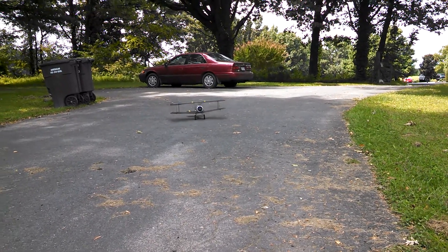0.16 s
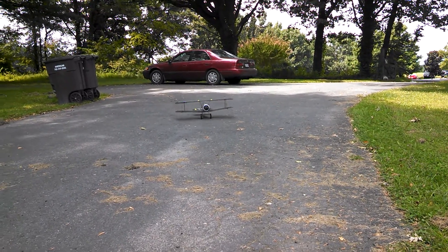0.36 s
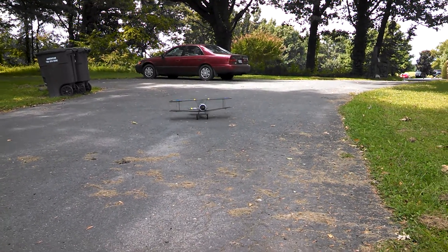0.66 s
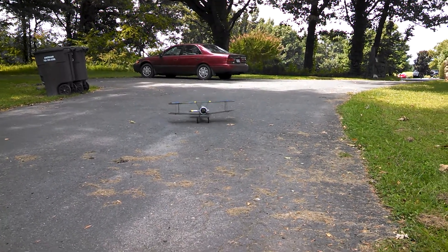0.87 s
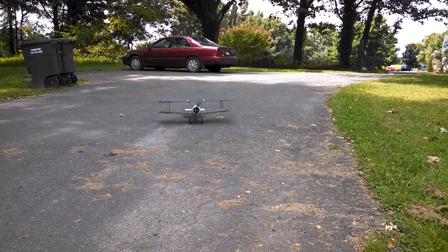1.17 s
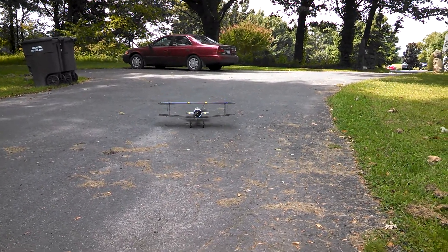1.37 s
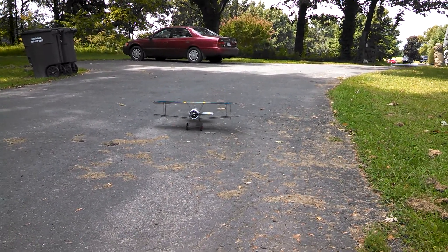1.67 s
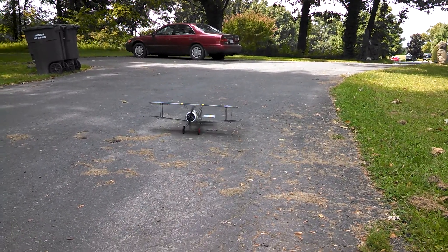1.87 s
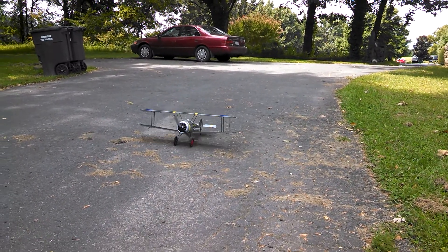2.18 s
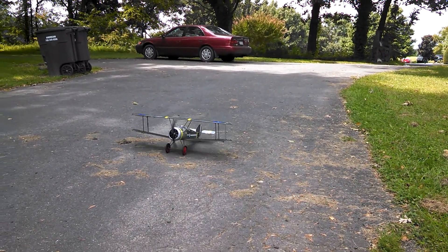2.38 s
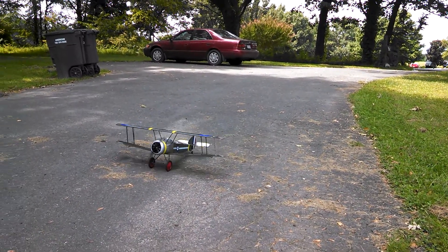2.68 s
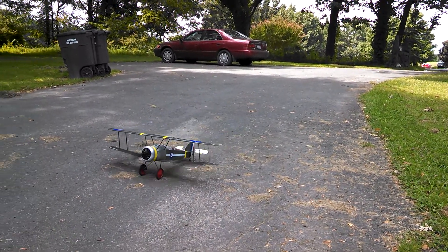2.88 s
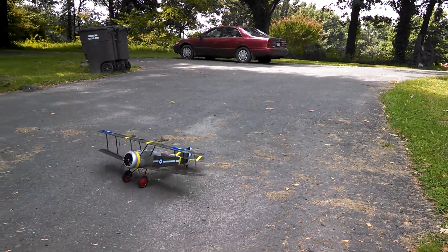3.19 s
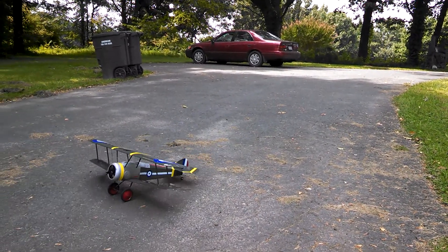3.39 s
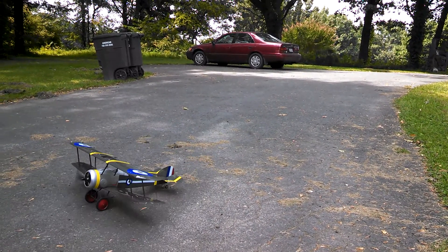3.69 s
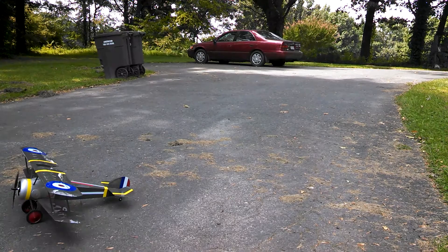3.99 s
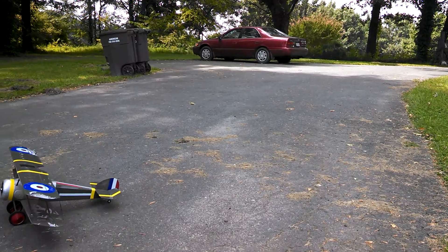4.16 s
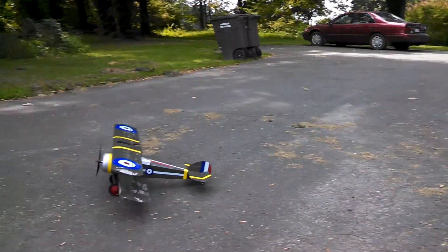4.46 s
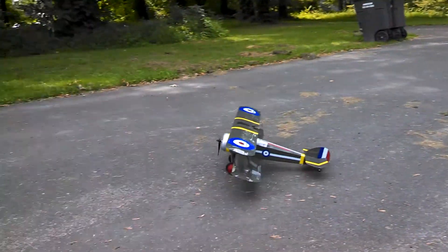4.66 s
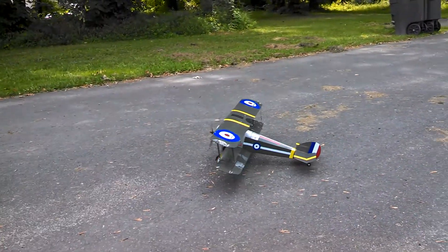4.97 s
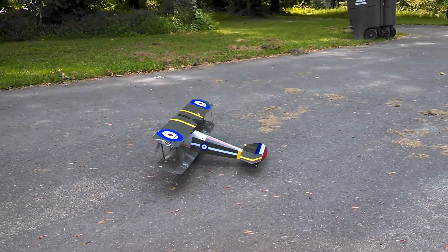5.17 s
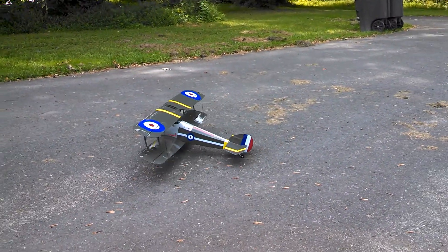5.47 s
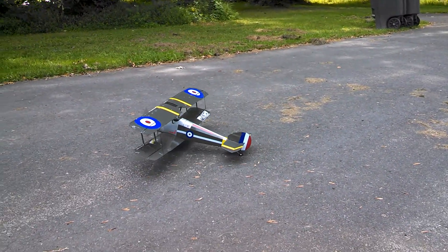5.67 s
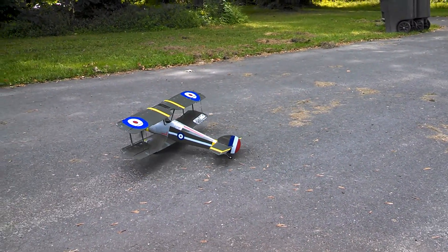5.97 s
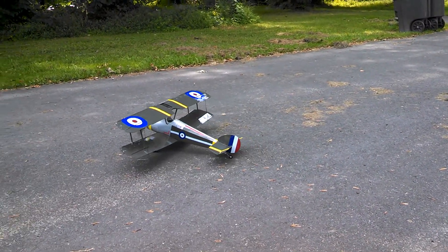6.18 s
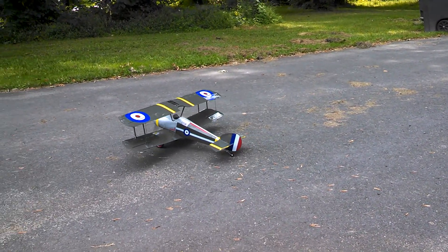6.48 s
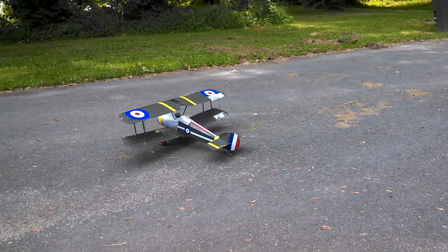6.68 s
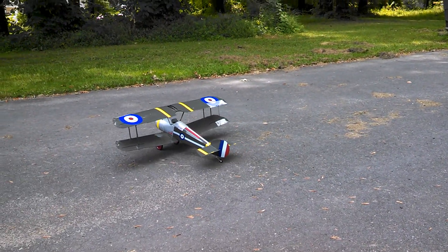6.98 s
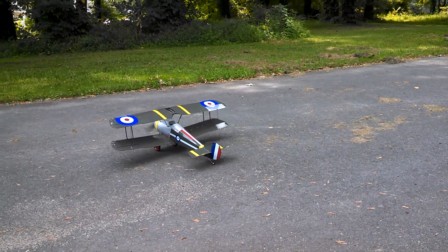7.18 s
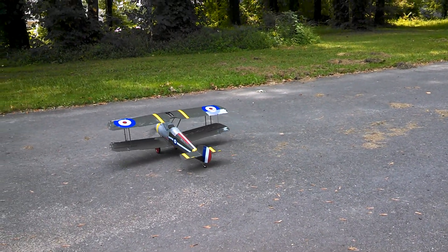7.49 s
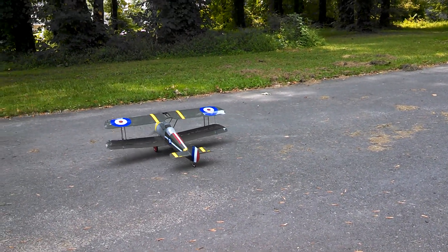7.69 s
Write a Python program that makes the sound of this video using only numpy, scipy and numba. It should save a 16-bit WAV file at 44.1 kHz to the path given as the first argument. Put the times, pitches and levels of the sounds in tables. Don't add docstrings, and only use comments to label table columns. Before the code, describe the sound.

A small electric model plane whines and ticks over gritty pavement while a cicada buzzes in dipping pulses and wind gusts thump the microphone.

```python
import sys
import numpy as np
from scipy import signal
from scipy.fft import rfft, irfft, next_fast_len
from scipy.io import wavfile
from scipy.ndimage import uniform_filter1d
from numba import njit

SR = 44100
rng = np.random.default_rng(int(sys.argv[2]) if len(sys.argv) > 2 else 0)


def master(y):
    cut = np.clip(np.atleast_2d(y).T, -1, 1)
    pcm = np.round(cut * 32767)
    wavfile.write(sys.argv[1], SR, pcm.astype(np.int16))


def level_to_linear(level):
    exponent = np.asarray(level, float) / 20
    return 10 ** exponent


N = 346185
T = np.arange(N) / SR

# [t/s, shaft rate asked for f/Hz]
THROTTLE = [(.3, 29.5), (.62, 33), (.85, 28.5), (1.45, 24.9), (1.7, 22), (2.3, 25.5), (2.55, 32.8),
            (2.96, 34.7), (3.4, 27), (4.08, 28.6), (4.4, 30.4), (5.35, 29.9), (5.7, 30.9), (6.28, 31.8),
            (6.335, 41.4), (6.8, 41.9), (7.1, 40.1), (7.85, 37.5)]
# [t/s, order 36 re hiss level/dB, order 42 re order 36 level/dB]
MOTOR_LOAD = [(.3, -16, -13), (.62, -8, -6), (.85, -18, 7), (1.45, -11, 7.5), (1.7, -25, 10),
              (2.33, -18.5, 0), (2.58, -0.5, 0), (2.72, -6, 3), (2.98, 3.5, -18), (3.3, -2.5, -17),
              (3.85, -19, 3), (4.08, -3, -3), (4.4, -0.5, 1.5), (5.55, -1.5, 1), (6.27, -9, -1),
              (6.36, 2.5, -10), (6.75, 0.5, -6.5), (7.85, 1, -18)]
# [multiple of shaft rate, level/dB near 40 Hz, slope/(dB per Hz of shaft rate)]
LOW_ORDERS = [(12, -0.5, 1.5), (13, 3.5, 0.4), (14, -3, 0.6), (16, -21, -2.5), (24, -12, 3), (28, -3.5, 1),
              (35, 0.5, 0), (86, -27, 2)]
# [offset/shaft rates, level/dB, 1 = near flank, 0 = far flank]
SIDEBANDS = [(42, 5, 0), (14, -8, 0), (21, -12, 0), (4, 0, 1), (8, -5, 1), (-4, -6, 1), (-8, -6, 1)]
# [t/s, re hiss level/dB]
WHISTLE_LEVEL = [(0, 19.5), (.6, 19), (1.04, 12.5), (1.47, 14), (1.67, -14), (1.95, -2), (2.35, 20),
                 (2.5, 16), (2.8, 26.5), (3.4, 19.5), (4.08, 25), (4.6, 21), (5.4, 21), (5.75, 12),
                 (6.62, 17.5), (6.75, 26.5), (7.25, 27), (7.85, 13.5)]
# [t/s, f/Hz]
WHISTLE_PITCH = [(0, 7788), (.6, 7803), (1.45, 7824), (2.05, 7817), (2.5, 7798), (3.4, 7786), (4, 7779),
                 (6.35, 7769), (6.7, 7758), (7.85, 7757)]
# [t/s, depth/dB]
ECHO_FADES = [
    (2.88, 4),
    (3.08, 2),
    (3.49, 11),
    (4.53, 11),
    (4.72, 19.5),
    (5.16, 8),
    (5.91, 1),
    (7.788, 13),
]
# [t/s, re hiss level/dB]
ROLL = [(0, 15.5), (.4, 20.5), (.9, 21), (1.9, 23), (2.6, 21), (3.3, 21.5), (3.45, 15), (3.95, 13.5),
        (4.3, 17), (5.2, 11.5), (5.5, 7.5), (6, 7.5), (6.6, 11), (7.85, 15)]
# [t/s, body level/dB, sharp tick re body level/dB]
GRIT_STRIKES = [(0.379, -14.5, -11.5), (0.6523, -18.5, -14), (0.696, -22, -11), (0.824, -20, -13),
                (0.99, -37, 6), (1.195, -24, -13), (1.241, -20, -25), (1.2848, -22, -25), (1.453, -22, -9),
                (1.5, -15.5, -24), (1.5563, -16.5, -12), (1.6985, -19, -8), (1.7854, -18.5, -20),
                (1.929, -25.5, -15), (2.3033, -26, -5), (2.5096, -24.5, -6), (2.6686, -19.5, -7),
                (2.8842, -21.5, -8), (3.0874, -16, -37), (3.1552, -19, -13), (3.175, -20.5, -1),
                (3.2348, -18.5, -4.5), (3.493, -24, -7), (3.8143, -24.5, -7), (4.1248, -21, -23),
                (4.232, -22, -44), (4.4416, -25, -35), (4.636, -21, -17), (4.7345, -17.5, -35),
                (4.9502, -15, -27), (2.9025, -26, -17), (3.0149, -23, -9), (3.04, -23, -8),
                (3.0757, -24, -30), (3.1397, -28, -19), (3.193, -20.5, -8), (3.3139, -26, -20),
                (3.3395, -22.5, -10), (3.6087, -26, -22.5), (3.6326, -28, -24), (3.6675, -31, -23),
                (3.786, -29, -13.5), (3.9599, -24, -19), (4.2777, -24.5, -27), (4.7196, -22, -22),
                (5.133, -33, -26), (5.161, -38, -25), (5.362, -27, -17), (0.2257, -35, -15),
                (0.335, -32, -22), (0.422, -28.5, -21), (0.511, -29, -10), (0.617, -27, -20),
                (0.8684, -24.5, -11), (1.06, -28.5, -12), (1.3954, -30, -20), (1.4243, -32, 1),
                (1.6453, -40, -3), (1.8214, -22, -16), (2.3328, -28.5, 1)]
# [f/Hz, width/Hz, level/dB]
AIRFRAME = [(567, 147, -1.5), (1498, 683, -1), (2600, 170, -59), (1764, 154, -15)]
# [f/Hz, density level/dB]
CHORUS = [(2200, -99), (3000, -17.5), (3650, -3), (4100, -24), (4900, -9.5), (5700, 3.5), (7000, -6.5),
          (8500, -3.5), (10000, -41)]
# [f/Hz, density level/dB]
GROUND = [(200, 15), (500, 14.5), (800, -0.5), (1500, -13), (2200, -6), (2750, -48), (5000, 0.5),
          (10000, -49)]
# [f/Hz, density level/dB]
HISS = [(300, 4), (2750, -7), (4000, 8.5), (9000, -14), (12500, -11), (15300, 3), (15600, -8)]
# [f/Hz, width/Hz, level/dB]
FAR_SINGERS = [(3618, 47, -6.5), (4100, 9.6, -12.5), (4630, 15, -9.5), (5310, 18, -1), (6404, 19, -6.5),
               (6730, 40, -13.5), (7300, 31, -32)]
# [crest t/s, rumble level/dB, length/s, edge re rumble level/dB]
GUSTS = [(0.597, -32.5, 0.39, -18), (0.768, -26, 0.16, -17.5), (1.109, -29.5, 0.18, -20.5),
         (1.362, -33, 0.13, -13), (1.486, -23, 0.089, -17), (1.65, -34, 0.24, -23), (1.856, -31, 0.066, -4),
         (1.998, -31, 0.17, -9.5), (2.253, -32, 0.052, -6.5), (2.583, -38.5, 0.51, -20),
         (2.732, -36, 0.22, -22), (3.055, -40, 0.14, -18), (3.283, -43, 0.14, -15),
         (3.754, -40.5, 0.32, -19), (4.007, -23.5, 0.087, -8), (4.29, -37.5, 0.091, -14.5),
         (4.62, -38.5, 0.061, -17), (4.746, -29.5, 0.04, -21), (5.033, -40, 0.48, -37),
         (5.457, -31, 0.13, -16), (5.605, -24, 0.088, -7.5), (5.893, -41, 0.3, -5.5),
         (6.032, -33, 0.18, -30.5), (6.359, -33.5, 0.093, -7), (6.595, -44, 0.26, -34),
         (7.111, -40, 0.1, -15), (7.415, -33.5, 0.071, -18.5), (7.608, -39, 0.15, -21)]
# [t/s, peak level/dB, f/Hz]
EDDIES = [(0.546, -29.5, 209), (0.668, -14, 87), (0.779, -11, 100.4), (0.906, -21, 91.5), (1.354, -23, 119),
          (1.871, -18.5, 232), (1.884, -15, 109), (1.967, -18, 277), (1.992, -14, 179), (2.25, -27, 267),
          (2.271, -30.5, 92), (2.504, -24.5, 132), (3.99, -11.5, 122), (4.008, -21, 96),
          (4.037, -18.5, 298), (4.138, -27, 156), (4.299, -26.5, 150), (5.443, -25, 199), (5.521, -22, 204),
          (5.596, -12.5, 160), (5.612, -14, 100), (5.616, -18, 393), (5.64, -38, 91.5), (5.723, -23.5, 101),
          (5.804, -30, 170), (5.466, -15.5, 111), (6.025, -26, 134), (6.354, -18.5, 135),
          (6.389, -22.5, 138), (7.129, -26.5, 127), (5.617, -45, 600), (4.001, -30.5, 445)]
# [t/s, length/s, stack re hiss level/dB, preceding buzz re hiss level/dB]
DROPS = [(0.056, 0.17, 12.5, 22), (0.661, 0.19, 15.5, 18), (1.258, 0.19, 14.5, 15.5), (1.848, 0.21, 15, 18),
         (2.439, 0.17, 16, 19.5), (3.008, 0.2, 13, 19), (3.409, 0.13, 10, 11), (3.914, 0.22, 9.5, 15),
         (4.458, 0.22, 18, 19.5), (5.011, 0.2, 17, 18), (5.539, 0.2, 15.5, 16.5), (6.102, 0.188, 13, 12.5),
         (6.695, 0.15, 17.5, 13), (7.22, 0.14, -13, 18), (7.84, 0.12, 0, 13)]
# [multiple of click rate, level/dB]
STACK = [(9, -13), (10, -2), (11, -7), (12, 0), (12.5, -12), (13, -8), (14, -16)]
# [t/s, push level/dB, ring level/dB, ring f/Hz, decay/ms, swing f/Hz]
KNOCKS = [
    (3.3979, -11.5, -23, 7600, 2.5, 800),
    (7.0811, -13, -15, 4000, .8, 600),
]
# [t/s, hiss level/dB]
DUCKS = [(0, -51), (.55, -52), (0.788, -58), (1.981, -63.5), (2.27, -58), (3.181, -56.5), (3.399, -59),
         (4.018, -63.5), (5.47, -51), (5.596, -58.5), (5.613, -63.5), (6.03, -58.5), (7.083, -65.5),
         (7.41, -60.5)]

SPIN_UP_S, SHAFT_JITTER = .13, .003
SURGE_DB_PER_HZ_S = 0.07
LOW_DB, NEAR_FLANK_DB, FAR_FLANK_DB = -2, -20, -8
CLOSE_S, APPROACH_DB_PER_S = 2.2, 7
FADE_S = 0.043
THUD_FAR_DB, THUD_NEAR_DB, NEAREST_S, NEAR_FOR_S = -31, -18, 3.35, 2.1
BREEZE_DB, BREEZE_EDGE_DB = -52.5, -15.5
GUST_SLOPE_DB, RISE_SHARE = 15.5, 0.59
STACK_FROM, STACK_FOR = .17, .58
STACK_TILT_DB = 7
HALF_RATE_SHARE = .12
RISE_FROM, RISE_DB = .7, -10
CASE_HZ, CASE_DB = 6250, -1
BRIGHT_HZ_MS, SNAP_DB_MS, SNAP_S = 21000, 6.3, .00004
OPEN_DB, RECOVER_DB_PER_S = -53, 9.5
CROSS_LAG_SAMPLES, TOP_HZ = 16, 15550
MISMATCH_DB, MISMATCH_HZ = 1.12, 2390


def columns(table):
    s, *rest = np.transpose(table)
    return [np.interp(T, s, c) for c in rest]


def unit(x):
    return x / np.sqrt(np.mean(x ** 2))


def band(x, lo_hz, hi_hz, order=2):
    return signal.sosfilt(signal.butter(order, [lo_hz, hi_hz], "bandpass", fs=SR, output="sos"), x)


def lowpass(x, hz, order):
    return signal.sosfilt(signal.butter(order, hz, fs=SR, output="sos"), x)


def half_sine(part):
    return np.sin(np.pi * part.clip(0, 1)).clip(0)


def walk(rate_hz):
    k = int(SR / rate_hz)
    held = np.repeat(rng.standard_normal(N // k + 1), k)
    return 1.3 * uniform_filter1d(uniform_filter1d(held, k), k)[:N]


def coloured(spectrum, alike):
    hz, db = np.transpose(spectrum)
    size = next_fast_len(N)
    bin_hz = np.arange(size // 2 + 1) * SR / size
    shape = level_to_linear(np.interp(np.log(bin_hz + 1), np.log(hz), db, left=-60, right=-60))
    a, b = irfft(rfft(rng.standard_normal((2, size))) * shape, size)[:, :N]
    return unit(np.array([a, alike * a + np.sqrt(1 - alike ** 2) * b]))


def ports(x, far_db, lag_samples):
    size = next_fast_len(N)
    turn = np.exp(-2j * np.pi * np.arange(size // 2 + 1) / size * lag_samples)
    return np.array([x, level_to_linear(far_db) * irfft(rfft(x, size) * turn, size)[:N]])


def tone(hz):
    cycles = np.cumsum(hz) / SR + rng.random()
    return np.sqrt(2) * np.sin(2 * np.pi * (cycles % 1))


@njit
def svf(x, hz, width):
    y, b, l = np.empty(len(x)), 0., 0.
    for i in range(len(x)):
        g, k = np.tan(np.pi * hz[i] / SR), width / hz[i]
        v = (b + g * (x[i] - l)) / (1 + g * (g + k))
        b, l, y[i] = 2 * v - b, l + 2 * g * v, k * v
    return y


def resonate(x, hz, width_hz):
    return unit(svf(svf(x, hz, width_hz), hz, width_hz))


def recorder_gain():
    s, db = np.transpose(DUCKS)[:, :, None]
    recovering_db = np.where(T >= s, db + RECOVER_DB_PER_S * (T - s), OPEN_DB)
    return uniform_filter1d(recovering_db.min(axis=0).clip(max=OPEN_DB), size=64)


def motor(hiss_db):
    (shaft,), (load_db, balance_db) = columns(THROTTLE), columns(MOTOR_LOAD)
    keep = np.exp(-1 / (SPIN_UP_S * SR))
    shaft = shaft[0] + signal.lfilter([1 - keep], [1, -keep], shaft - shaft[0])
    surge_db = SURGE_DB_PER_HZ_S * np.gradient(uniform_filter1d(shaft, size=1500), 1 / SR).clip(0)
    shaft = shaft * (1 + 0.00193 * walk(11) + SHAFT_JITTER * walk(70))

    slot_db = hiss_db + load_db + surge_db
    magnet_db, low_db = slot_db + balance_db, slot_db + LOW_DB
    hum = level_to_linear(slot_db + 5 + 1.5 * walk(35)) * tone(36 * shaft)
    hum = hum + level_to_linear(magnet_db + 5 + 1.7 * walk(35)) * tone(42 * shaft)
    for k, db, gain_db in LOW_ORDERS:
        level = level_to_linear(low_db + db + gain_db * (shaft - 40.5))
        hum = hum + level * (1 + 0.21 * walk(18)) * tone(round(k) * shaft)

    (whistle_hz,), (whistle_db,) = columns(WHISTLE_PITCH), columns(WHISTLE_LEVEL)
    fade_db = sum(db * np.exp(-((T - s) / FADE_S) ** 2) for s, db in ECHO_FADES)
    whistle_db = hiss_db + whistle_db - fade_db
    distance_db = APPROACH_DB_PER_S * (CLOSE_S - T).clip(0)
    far_flank = level_to_linear(hiss_db + FAR_FLANK_DB + surge_db / 2 - distance_db - whistle_db)
    carrier_level = level_to_linear(whistle_db + 2.0 * walk(22))
    whistle = tone(whistle_hz)
    for k, db, near in SIDEBANDS:
        flank = level_to_linear(NEAR_FLANK_DB) if near > .5 else far_flank
        whistle = whistle + flank * level_to_linear(db) * (1 + 0.25 * walk(15)) * tone(whistle_hz + int(k) * shaft)
    return ports(hum, -4.5, 10.1) + ports(carrier_level * whistle, -12.5, 1.27)


def wheels(hiss_db, roll_db):
    body, thud, tick = np.zeros((3, N))
    n = np.arange(256)
    envelope = np.hanning(512)[256:] ** 2 * np.minimum(n / 30, 1)
    shots = rng.standard_normal((len(GRIT_STRIKES), 256)) * envelope
    for (s, body_db, sharp_db), shot in zip(GRIT_STRIKES, shots):
        i = int(s * SR)
        near = np.exp(-((s - NEAREST_S) / NEAR_FOR_S) ** 2)
        thud_db = body_db + THUD_FAR_DB + near * (THUD_NEAR_DB - THUD_FAR_DB)
        body[i:i + 256] += level_to_linear(body_db + 8.5) * shot * np.minimum(n / 70, 1)
        thud[i:i + 256] += level_to_linear(thud_db + 32.0) * shot
        tick[i:i + 256] += level_to_linear(body_db + sharp_db + 8) * shot * np.exp(-n / 100)
    grit = rng.standard_normal(N) * level_to_linear(3.94 * walk(60).clip(max=2) + hiss_db + roll_db + 3.5)
    rings = sum(level_to_linear(db) * band(drive + grit, hz - w / 2, hz + w / 2, order=1)
                for drive, (hz, w, db) in zip((thud, body, body, body), AIRFRAME))
    sharp = band(tick, 3800, 10800, order=1)
    scuff = level_to_linear(-16.5) * band(grit, 5500, 9300, order=1)
    return ports(rings + sharp + scuff, -10.5, 9.4)


def far_singers():
    noise = rng.standard_normal((len(FAR_SINGERS), 2, N))
    return sum(level_to_linear(db + 2 * walk(4.69)) * unit(band(x, hz - w / 2, hz + w / 2, order=1))
               for x, (hz, w, db) in zip(noise, FAR_SINGERS))


def background():
    hiss = level_to_linear(6.0) * coloured(HISS, 0.012)
    chorus = level_to_linear(13.0 + 1.26 * walk(5.8)) * coloured(CHORUS, 0.019)
    ground = level_to_linear(3.0 + walk(17.0)) * coloured(GROUND, 1.0)
    return hiss + chorus + ground + level_to_linear(7.5) * far_singers()


def gusts():
    rumble, edge = level_to_linear(2 * BREEZE_DB), level_to_linear(2 * (BREEZE_DB + BREEZE_EDGE_DB))
    for s, db, length, edge_db in GUSTS:
        side_s = length * np.where(T < s, RISE_SHARE, 1)
        power = level_to_linear(2 * (db - GUST_SLOPE_DB * np.abs(T - s) / side_s))
        rumble, edge = rumble + power, edge + level_to_linear(2 * edge_db) * power
    return 10 * np.log10(rumble), 10 * np.log10(edge / rumble)


def wind():
    rumble_db, edge_db = gusts()
    lumps_db = 3 * walk(30).clip(max=1.5)
    rumble = unit(band(rng.standard_normal((2, N)), 24.7, 107.7, order=3)) * level_to_linear(lumps_db)
    edge_db = edge_db + lumps_db + 4.6 * walk(80).clip(max=1.3)
    edge = unit(band(rng.standard_normal((2, N)), 62, 265, order=3)) * level_to_linear(edge_db)
    out = level_to_linear(rumble_db + np.array([[9], [11]])) * (rumble + edge)
    t = np.arange(-512, 512) / SR
    for (s, db, hz), turn in zip(EDDIES, rng.random(len(EDDIES))):
        i = int((s + 0.00605) * SR)
        slap = np.exp(-(1.75 * hz * t) ** 2) * np.sin(2 * np.pi * (hz * t + turn))
        out[1, i - 512:i + 512] += level_to_linear(db + 11.5) * slap
    return .5 * np.tanh(out / .5)


def cicada(hiss_db):
    chance = rng.standard_normal((int(N / SR * 320), 2))
    at = (np.cumsum(1 + .04 * chance[:, 0]) * SR / 286).astype(int)
    clicks = np.zeros(N)
    clicks[at[at < N]] = level_to_linear(3.3 * chance[:, 1])[at < N]
    tail = rng.standard_normal(2048) * np.exp(-np.arange(2048) / (0.012 * SR))
    tail[0] = 8
    smeared = signal.fftconvolve(clicks, tail)[:N]

    drop, swell, rise = np.zeros((3, N))
    rate_hz = np.full(N, 362.)
    for s, length, db, _ in DROPS:
        span = slice(int(s * SR), int((s + length) * SR))
        part = (T[span] - s) / length
        drop[span] = np.abs(np.sin(np.pi * part)) ** 0.9
        swell[span] = level_to_linear(db) * half_sine((part - STACK_FROM) / STACK_FOR) ** 0.39
        rate_hz[span] += 38 * (part - .66) ** 2
        rise[span] = level_to_linear(db + RISE_DB) * half_sine((part - RISE_FROM) / (1 - RISE_FROM))

    start, length, _, effort_db = np.transpose(DROPS)
    coming = np.minimum(np.searchsorted(start + length / 2, T), len(start) - 1)
    effort_db = uniform_filter1d(effort_db[coming], size=2000)
    belly_hz = 5750 - 1600 * drop
    buzz = resonate(smeared, belly_hz, 1200.) + level_to_linear(-5) * resonate(smeared, 1.15 * belly_hz, 1300.)
    buzz = buzz * level_to_linear(-18 * drop ** 3 + 1.2 * walk(14))
    note = resonate(smeared, belly_hz, 260.)

    stack = np.zeros(N)
    for k, db in STACK:
        level = level_to_linear(db + STACK_TILT_DB * (k - 11.5) * (1 - drop))
        stack += level * (1 + 0.4 * walk(40)) * tone(k * rate_hz)
    stack = stack * (1 + HALF_RATE_SHARE * (1 + walk(8)).clip(0) * tone(rate_hz / 2))
    song = level_to_linear(effort_db + 2.5) * buzz + swell * stack + rise * note
    return ports(level_to_linear(hiss_db) * song, -23.5, 3.9)


def knocks():
    out = np.zeros((2, N))
    t = np.arange(96) / SR
    phase = np.array([[2.5], [.8]])
    for s, push_db, ring_db, ring_hz, decay_ms, swing_hz in KNOCKS:
        i = int(s * SR)
        fade = np.exp(-t / (decay_ms / 1000)) * np.cos(np.pi / 2 * t / t[-1])
        swing = np.cos(2 * np.pi * swing_hz * t - swing_hz / 800)
        crackle = .8 * uniform_filter1d(rng.standard_normal(len(t)), size=2)
        ring = sum(level_to_linear(db) * np.sin(2 * np.pi * hz * t + phase)
                   for hz, db in ((ring_hz, 0), (CASE_HZ, CASE_DB)))
        snap_db = push_db + SNAP_DB_MS / decay_ms + np.array([[-7], [0]])
        out[1, i:i + 96] += level_to_linear(push_db) * fade * (swing + crackle)
        out[:, i:i + 96] += level_to_linear(ring_db) * fade * ring
        out[:, i:i + 96] += level_to_linear(snap_db) * np.exp(-t / SNAP_S)
        top_hz = min(BRIGHT_HZ_MS / decay_ms, 20000)
        out[:, i:i + 256] = lowpass(out[:, i:i + 256], top_hz, 4)
    return out


def scene():
    hiss_db, (roll_db,) = recorder_gain(), columns(ROLL)
    plane = motor(hiss_db) + wheels(hiss_db, roll_db)
    return plane + level_to_linear(hiss_db) * background() + wind() + cicada(hiss_db) + knocks()


def roll_off(x):
    return signal.sosfilt(signal.butter(12, 16880, fs=SR, output="sos"), x)


def record(dry):
    other = np.pad(dry[::-1], ((0, 0), (CROSS_LAG_SAMPLES, 0)))[:, :N]
    crossed = dry - other
    mismatch = level_to_linear(MISMATCH_DB * np.array([[-1], [1]])) - 1
    crossed = crossed + mismatch * lowpass(crossed, MISMATCH_HZ, 1)
    crossed = signal.sosfilt(signal.ellip(8, .2, 60, TOP_HZ, fs=SR, output="sos"), crossed)
    crossed = signal.sosfilt(signal.butter(3, 44, "highpass", fs=SR, output="sos"), crossed)
    return roll_off(crossed)


dry = scene()
out = record(dry)
master(out)
```